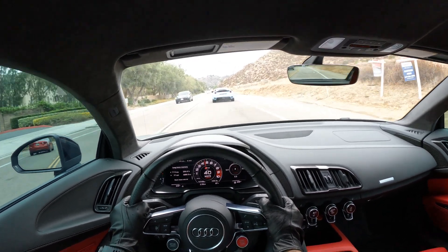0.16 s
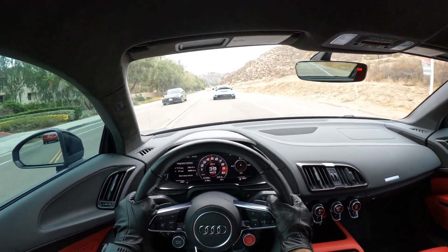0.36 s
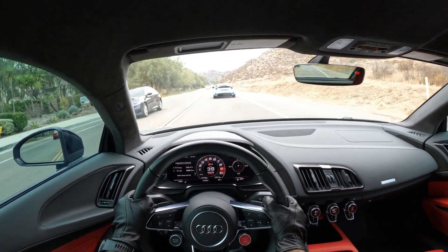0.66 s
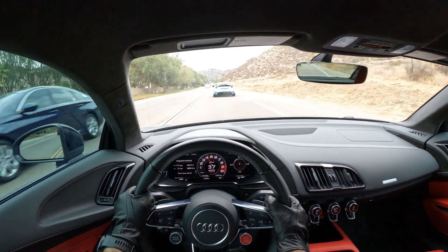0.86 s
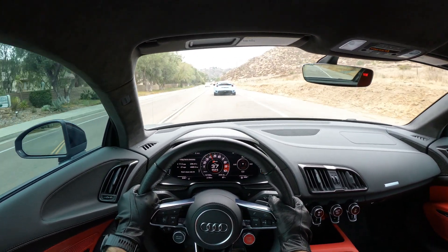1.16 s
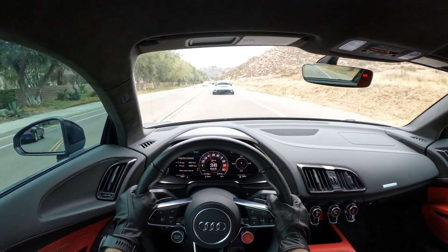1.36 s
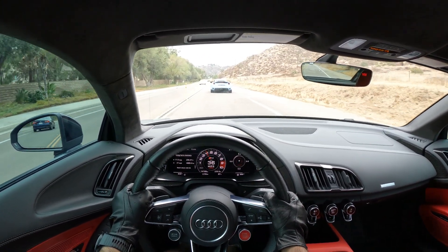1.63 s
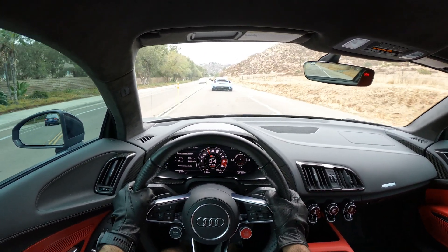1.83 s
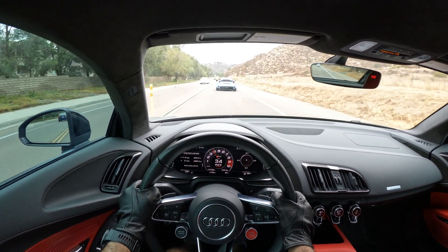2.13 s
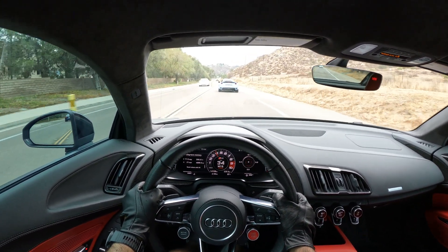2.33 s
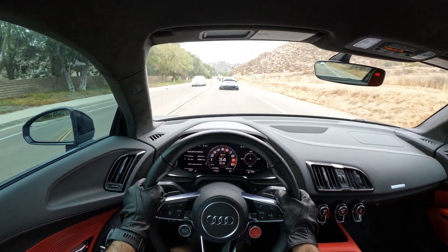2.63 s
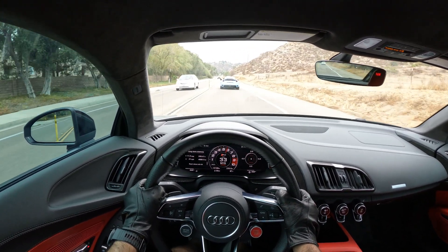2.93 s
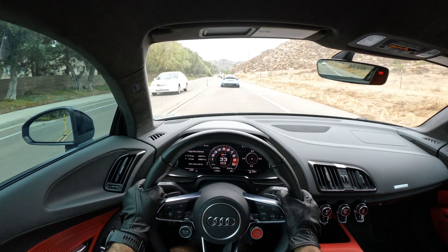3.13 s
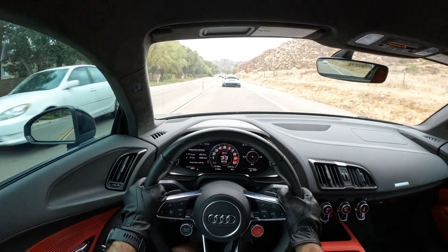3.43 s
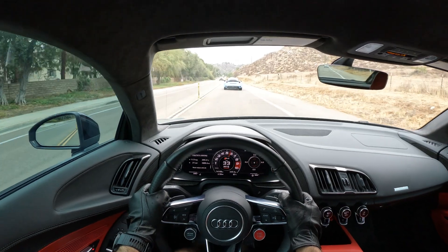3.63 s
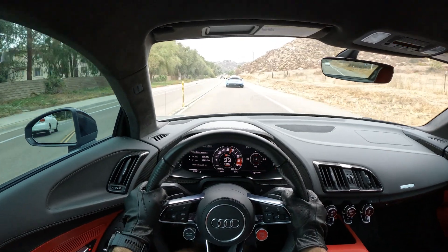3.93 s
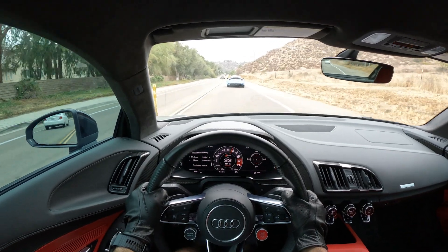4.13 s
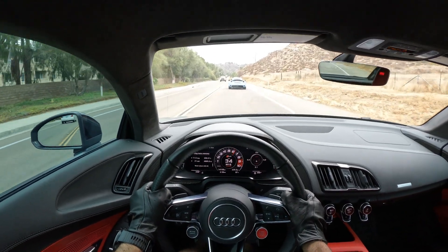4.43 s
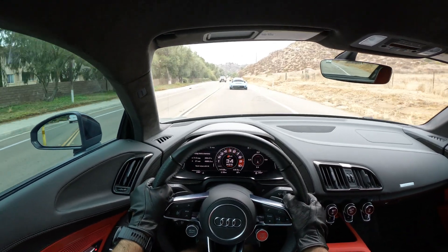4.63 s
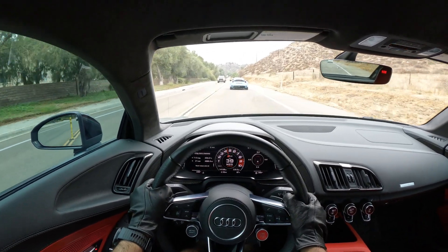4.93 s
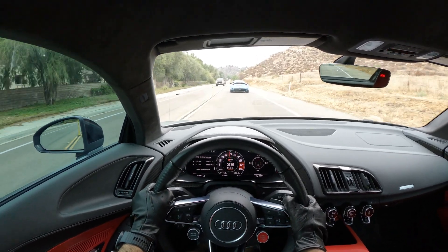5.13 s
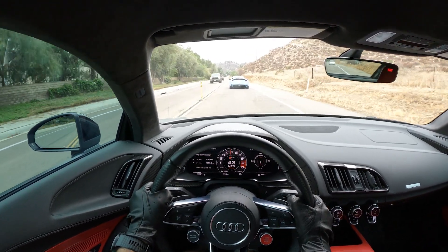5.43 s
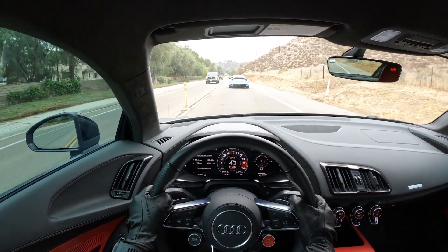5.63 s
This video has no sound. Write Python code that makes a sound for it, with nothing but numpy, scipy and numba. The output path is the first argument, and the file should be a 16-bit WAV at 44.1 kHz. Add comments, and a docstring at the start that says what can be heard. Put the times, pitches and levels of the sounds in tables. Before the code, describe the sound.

Close to the tailpipes, a ten-cylinder engine overruns, barks up, drones hard, snaps through a gear change and ends in sharp crackles.

```python
"""Ten-cylinder exhaust with backfires

A sports car near its tailpipes coasts down with backfires, blips up a downshift, cruises, pulls, shifts up
with a bang, then lifts off and backfires again. Firing harmonics, the lines of five unequal cylinders, gas
noise, clatter and order tones share one crank phase; blasts are decaying modes, burbles short low thuds.
Filtered noise makes the road and a thumping rumble; an overloaded microphone swings slowly after
backfires and clips the peaks.
"""
import sys
import numpy as np
from scipy import signal
from scipy.fft import rfft, irfft
from scipy.io import wavfile
from scipy.ndimage import uniform_filter1d, map_coordinates
from numba import njit

SR = 44100
rng = np.random.default_rng(int(sys.argv[2]) if len(sys.argv) > 2 else 0)


def bounce(signal):
    """Save signal as a 16-bit WAV file at the path given by the first command-line argument."""
    frames = np.transpose(np.atleast_2d(signal))
    limited = np.clip(frames, -1, 1)
    pcm = np.round(limited * 32767).astype(np.int16)
    wavfile.write(sys.argv[1], SR, pcm)


N = 255339  # samples

# Engine course in groups: coasting, blip, cruise and pull, gear change, pull and lift-off.
# Each row: time in s, firing rate in Hz, firing note in dB rms before flutter, relative gas rush in dB.
ENGINE = [
    [(0.01, 191.7, -30.5, -60), (0.11, 188.6, -26.5, -59.5), (0.27, 190.7, -25.5, -56),
     (0.6, 182, -29, -58.5), (0.9, 177.1, -30.5, -59.5), (1.25, 171.9, -35, -60), (1.7, 164.5, -38.5, -65),
     (2.05, 159.9, -36.5, -65), (2.28, 159.5, -36.5, -65)],
    [(2.31, 162, -29, -78), (2.338, 164.2, -20, -49), (2.43, 202.1, -11.5, -41.5),
     (2.472, 219.1, -11, -34.5), (2.5, 230.9, -11.5, -42.5), (2.522, 229.5, -8, -33.5),
     (2.536, 224.2, -19.5, -45.5), (2.546, 226.7, -13.5, -36.5), (2.57, 224.9, -18.5, -49)],
    [(2.62, 230.9, -15.5, -52), (2.72, 237.1, -12, -46.5), (2.78, 234, -17.2, -50.5),
     (2.87, 238.6, -13.5, -50), (2.96, 241.0, -15, -49.5), (3.02, 231, -19.0, -52.5),
     (3.17, 228.5, -19, -54), (3.36, 243.3, -15.5, -50.5), (3.48, 242.9, -15.5, -50.2),
     (3.7, 235.3, -17.5, -53), (3.9, 242.3, -15.5, -50), (4.04, 247.7, -15.5, -48), (4.19, 240, -15, -54.5),
     (4.27, 250.4, -13, -45.5), (4.38, 262.4, -12, -35), (4.46, 264.4, -12, -34), (4.573, 260.4, -12, -40)],
    [(4.582, 252.3, -32, -47), (4.594, 247.4, -18, -53), (4.66, 195.3, -17, -48), (4.668, 192.9, -21, -60)],
    [(4.68, 186.3, -11, -33), (4.714, 184.4, -14.5, -44), (5.2, 207.1, -14, -44.5),
     (5.29, 201.8, -13.5, -44.5), (5.324, 199.7, -17, -52), (5.402, 195.4, -26, -55),
     (5.506, 207.0, -27.5, -57), (5.58, 203.1, -24.5, -54)],
]
# Overtone level at middle load, by place in the exhaust. Each row: frequency in Hz, level in dB.
PIPE = [(320, -11), (380, -11.5), (420, -14.5), (455, -23), (473, -30), (488, -25), (530, -23.5),
        (610, -25), (660, -24.5), (705, -44), (735, -32.5), (790, -49), (1000, -43.5), (1060, -40),
        (1320, -42.5), (1600, -50), (1850, -59), (2110, -59.5), (2640, -60)]
# Lag of the overtones behind the note. Each row: frequency in Hz, lag in radians.
PIPE_LAG = [(440, 1.5), (475, .2), (540, .2), (560, 2.)]
# Lines between the firing harmonics, from unequal cylinders.
# Each row: multiple of the five-firing pattern rate, relative level in dB.
UNEVEN = [(1, -19), (2, -16), (3, -14.5), (4, -4), (6, -12), (7, -14.5), (8, -0.5), (9, -6.5), (11, -12.5),
          (12, -30), (13, -19), (14, -10.5), (16, -17), (18, -15)]
# Relative sharpness of each blowdown in the pattern. Each entry: mean size in dB.
CYLINDER_DB = [0., -4., -2., -1., -5.]
# Rasp resonances of the blowdowns. Each row: centre in Hz, width in Hz, relative gain in dB.
RASP = [(610, 130, -3), (1084, 310, -1.5), (1252, 240, 1.5), (1510, 363, -6), (2215, 600, -16.5)]
# Spectrum of the rushing gas. Each row: frequency in Hz, relative density in dB per Hz.
GAS = [(2500, -25.5), (4000, 0.5), (4800, -6), (5800, -3.5), (7000, -4.5), (8900, -5.5), (11000, -12),
       (15900, -18)]
# Tailpipe tips rung by the gas. Each row: centre in Hz, width in Hz, relative gain in dB.
EDGE = [(2600, 500, 0), (3580, 280, 4), (4200, 300, 1.5)]
# Spectrum of valve gear and timing drive. Each row: frequency in Hz, relative density in dB per Hz.
CLATTER = [(400, -21.5), (700, -3.5), (1100, -0.5), (2000, -1), (2700, -1.5), (3500, -20.5), (5000, -20.5),
           (9000, -36)]
# Engine order tones: the third firing harmonic's floor and higher whine.
# Each row: multiple of the pattern rate, peak level in dB before flutter.
ORDER_TONES = [(15, -49), (30, -57), (32, -61), (34, -60), (42, -63), (48, -62), (59, -65), (70, -65)]
# Backfires, with the overloaded microphone's slow swing after each.
# Each row: start in s, then relative levels in dB of the blast, its crack, top snap, microphone swing.
POPS = [(0.3141, -7.5, -3.5, -28, -30), (0.3339, -9.5, -9, -22.5, -58), (0.35, -8, -13.5, -35, -48),
        (0.503, -6.5, -2.5, -14.5, -35), (2.518, -8.5, -23, -30, -46), (2.739, -11.5, -17, -35, -38),
        (4.674, -4, -12, -27.5, -33), (5.609, -7, 0.5, -8, -16.5), (5.619, -16, -8, -27, -56),
        (5.663, -7.5, -9, -34, -50), (5.719, -7.5, -20, -29.5, -47.5), (5.735, -7.5, -5, -26, -35),
        (5.787, -16, -7.5, -24, -34)]
# Pipe modes rung by a backfire. Each row: mean frequency in Hz, relative level in dB, 60 dB decay in s.
POP_MODES = [(130, -19.5, 0.18), (277.3, -2.5, 0.14), (395, 11, 0.027), (604, 7.5, 0.022), (1174, 2, 0.028),
             (1430, 7, 0.013), (1625, 12.5, 0.014), (2660, 0.5, 0.016), (3750, -11, 0.027),
             (4590, 1.5, 0.0095), (5180, -16, 0.014), (6440, -29, 0.023), (10497, -48, .008)]
# Muffled burbles deep in the silencer. Each row: start in s, relative level in dB, pitch in Hz.
BURBLES = [(0.07, -19, 188), (0.548, -8, 172), (0.631, -6.5, 207.2), (0.92, -10, 146.7), (2.042, -17, 74.9),
           (2.089, -12.5, 296), (2.54, 2, 240), (2.564, 0, 240.9), (2.733, 1.5, 240), (2.958, -21, 237.7),
           (4.574, -23, 232.1), (4.7, -2, 200.5), (5.469, -8, 198.5)]
# Spectrum of the road noise. Each row: frequency in Hz, relative density in dB per Hz.
ROAD = [(15, -14.5), (25, 11), (45, -7.5), (90, -31), (140, -2.5), (250, 0.5), (400, -5), (650, -11),
        (1100, -18), (2100, -20), (4000, -34), (8600, -39), (15500, -48)]
# Low thumps through the body. Each row: start in s, relative gain in dB.
THUMPS = [(0.037, -18.5), (0.189, -33.5), (0.482, -17), (0.8, -44), (1.139, -37), (1.759, -30),
          (2.028, -21.5), (2.149, -21), (2.397, -19), (2.549, -12), (2.726, -23), (2.944, -38),
          (4.357, -13), (4.552, -13), (4.666, -23), (5.539, -20), (5.689, -19), (5.759, -26)]

# Every load-dependent layer is given at a middle load and swings with the note and the gas.
MIDDLE_NOTE_DB, MIDDLE_GAS_DB = -15, -45
# Octave, third, overtones 4 to 10: dB per dB of note, dB per dB of gas.
OCTAVE_LAW, THIRD_LAW, UPPER_LAW = (1.404, 0.15), (1.66, 0.29), (0.033, 1.594)
# dB at middle load, dB per dB of note, dB per dB of gas.
UNEVEN_LAW, RASP_LAW = (-30.5, 0.82, 0.16), (-32, 0.062, 1.07)
# During the gear change the overtones drop away.
IGNITION_CUT_S, IGNITION_CUT_DB = (4.575, 4.671), -12
CLATTER_DB = -45.5  # rms before the speed law, whose gain is 1 at 200 firings/s
SECOND_PIPE_S = 0.000786  # the other tailpipe's blast comes later
# Uneven faint firing just before the blip: from-to s, mean dB, mean Hz, thuds.
GURGLE_S, GURGLE_DB, GURGLE_HZ, GURGLE_COUNT = (2.05, 2.29), -23, 330, 12
ROAD_DB = -37  # rms
RUMBLE_DB, THUMP_RISE_S, THUMP_FADE_S = -48.5, 0.0092, 0.047  # relative floor, time constants
TOP_HZ = 15950  # upper band limit


def undb(db):
    """Decibel definition: amplitude ratio from a level difference."""
    return 10 ** (np.asarray(db) / 20)


def level(x, db):
    """Mean-square normalisation: scale x to an rms level in dB."""
    return x * undb(db) / np.sqrt(np.mean(x ** 2))


@njit
def svf(x, hz, width):
    """Second-order resonance: a state-variable band-pass, gain 1 at the centre."""
    y, band, low = np.empty(len(x)), 0., 0.
    g, damping = np.tan(np.pi * hz / SR), width / hz
    for i in range(len(x)):
        v = (band + g * (x[i] - low)) / (1 + g * (g + damping))
        band, low, y[i] = 2 * v - band, low + 2 * g * v, damping * v
    return y


def resonate(x, peaks):
    """Modal superposition: parallel resonances of alternating sign."""
    return sum((-1) ** k * undb(db) * svf(x, 1. * hz, 1. * width)
               for k, (hz, width, db) in enumerate(peaks))


def walk(rate):
    """Slow random modulation: levels held 1 / rate s and slewed twice, spread near 1."""
    k = int(SR / rate)
    held = np.repeat(rng.standard_normal(N // k + 1), k)
    return 1.3 * uniform_filter1d(uniform_filter1d(held, k), k)[:N]


def coloured(points, x):
    """Spectral shaping: weight the spectrum of x by (Hz, dB) points, rms 1."""
    hz, db = np.transpose(points)
    log_f = np.log(np.fft.rfftfreq(N, 1 / SR) + 1)
    return level(irfft(rfft(x) * undb(np.interp(log_f, np.log(hz), db)), N), 0)


def ring(hz, t60, t):
    """Free damped vibration: a sine decaying 60 dB in t60 s."""
    return np.sin(2 * np.pi * hz * t) * np.exp(-np.log(1000) * t / t60)


def soften(x, size):
    """Finite pressure rise: a blast builds over about size samples."""
    return uniform_filter1d(uniform_filter1d(x, size=size), size=size)


def repeating(turns, hold_s):
    """Cyclic repetition: noise recurs with each pattern, blending to a new face every hold_s."""
    size = 768  # points per pattern
    age = np.arange(N) / SR / hold_s
    faces = rng.standard_normal((40, size))
    place = turns / len(CYLINDER_DB) % 1 * size
    return map_coordinates(faces, [np.minimum(age, 39), place], order=1, mode="grid-wrap")


def engine():
    """Phase locking: every engine layer follows one crank phase, counted in firings."""
    s, *columns = np.concatenate(ENGINE).T
    hz, note, gas_db = (np.interp(np.arange(N) / SR, s, c) for c in columns)
    turns = np.cumsum(hz * (1 + .001 * walk(40))) / SR

    def swing(by_note, by_gas):
        """Load dependence: dB change away from the middle load."""
        return by_note * (note - MIDDLE_NOTE_DB) + by_gas * (gas_db - MIDDLE_GAS_DB)

    uneven_db, rasp_db = (db + swing(*law) for db, *law in (UNEVEN_LAW, RASP_LAW))
    return (firing(turns, hz, note, swing) + uneven_lines(turns, uneven_db)
            + exhaust_gas(turns, rasp_db, gas_db) + clatter(turns, hz) + order_tones(turns))


def firing(turns, hz, note, swing):
    """Fourier series: the firing note and nine overtones, coloured and delayed by the pipe."""
    t = np.arange(N) / SR
    cut = IGNITION_CUT_DB * ((t > IGNITION_CUT_S[0]) & (t < IGNITION_CUT_S[1]))
    levels = [note]
    for k, law in enumerate([OCTAVE_LAW, THIRD_LAW] + [UPPER_LAW] * 7, start=2):
        levels.append(cut + np.interp(k * hz, *np.transpose(PIPE)) + swing(*law))
    out = 0
    for k, db in enumerate(levels, start=1):
        lag = (k > 1) * np.interp(k * hz, *np.transpose(PIPE_LAG))
        flutter = 0.57 * walk(60)  # dB
        out = out + np.sqrt(2) * undb(db + flutter) * np.cos(2 * np.pi * k * turns - lag)
    return out


def uneven_lines(turns, uneven_db):
    """Subharmonics of a repeating pattern: five unequal firings fill the gaps between harmonics."""
    out = 0
    for order, db in UNEVEN:
        angle = 2 * np.pi * (turns * order / len(CYLINDER_DB) + rng.random()) + 0.21 * walk(25)
        out = out + np.sqrt(2) * undb(uneven_db + db + 2.0 * walk(39)) * np.cos(angle)
    return out


def exhaust_gas(turns, rasp_db, gas_db):
    """Pulsed turbulence: decaying blowdowns modulate noise, which excites the rasp and pipe tips."""
    count = turns.astype(int)
    firings = count[-1] + 1
    size_db = np.resize(CYLINDER_DB, firings) + 1.2 * rng.standard_normal(firings)
    puff = undb(size_db)[count] * np.exp(-(turns - count) / .5)
    # the gas after each blowdown rushes nearly the same way every pattern
    rush = repeating(turns, .2) + .55 * rng.standard_normal(N)
    blow = puff * rush
    hiss = level((0.66 + puff) * coloured(GAS, rng.standard_normal(N)), -6.5)
    tips = level(resonate(blow + 0.45 * rush, EDGE), -0.11)
    rasp = level(resonate(blow, RASP), -0.21)
    return undb(rasp_db) * rasp + undb(gas_db) * (hiss + tips)


def clatter(turns, hz):
    """Periodic mechanical noise: valve gear and timing drive grow as the cube of speed."""
    return level(coloured(CLATTER, repeating(turns, .35)), CLATTER_DB) * (hz / 200) ** 3.0


def order_tones(turns):
    """Engine orders: the third firing harmonic's floor and higher whine keep fixed ratios to the crank."""
    out, waver = 0, .4 * walk(25)  # shared phase waver, radians
    for order, db in ORDER_TONES:
        angle = 2 * np.pi * turns * order / len(CYLINDER_DB) + waver
        out = out + undb(db + 3 * walk(3.4)) * np.cos(angle)
    return out


def backfires():
    """Impulsive excitation: unburnt fuel blasts ring both pipes, hiss, and overload the microphone."""
    lead = 32  # samples of room ahead of each blast for its softened rise
    out, t = np.zeros(N + SR), np.arange(-lead, SR // 4) / SR
    on = t >= 0
    chance = rng.standard_normal((len(POPS), len(POP_MODES)))
    # the overloaded microphone's slow swing: a quick dip, then a long swell
    mic_swing = on * (1 - np.exp(-t / .002)) * (.7 * np.exp(-t / .04) - 1.9 * np.exp(-t / .009))
    for (s, db, crack_db, snap_db, swing_db), jitter in zip(POPS, chance):
        modes = [(hz, on * undb(gain) * ring(hz * (1 + .03 * j), t60, t))
                 for (hz, gain, t60), j in zip(POP_MODES, jitter)]
        low = soften(sum(m for hz, m in modes if hz < 800), size=20)
        crack = undb(crack_db) * soften(sum(m for hz, m in modes if 800 <= hz < 2200), size=6)
        snap = undb(snap_db + 16.0) * sum(m for hz, m in modes if hz >= 2200)
        high = crack + snap
        high = high + 1.33 * np.interp(t - SECOND_PIPE_S, t, high, left=0)
        hiss = on * svf(rng.standard_normal(len(t)), 1500., 1700.0) * np.exp(-t / 0.0091)
        hiss = hiss * undb(crack_db - 2.0)
        blast = undb(db - 7.0) * (low + high + hiss)
        start = int(s * SR)
        out[start:start + len(t)] += blast + undb(swing_db + 15.5) * mic_swing
    return out[lead:N + lead]


def burbles():
    """Damped oscillation: soft low thuds with a dull overtone, and a faint gurgle before the blip."""
    out, t = np.zeros(N + SR), np.arange(SR // 8) / SR
    chance = rng.standard_normal((GURGLE_COUNT, 3))
    times = np.linspace(*GURGLE_S, GURGLE_COUNT) + .006 * chance[:, 0]
    gurgle = zip(times, GURGLE_DB + 3 * chance[:, 1], GURGLE_HZ * (1 + .2 * chance[:, 2]))
    for s, db, hz in [*BURBLES, *gurgle]:
        thud = ring(hz, 0.028, t) + 0.23 * ring(2.9 * hz, 0.021, t)
        thud = thud * (1 - np.exp(-t / 0.0022))  # soft onset
        start = int(s * SR)
        out[start:start + len(t)] += undb(db) * thud
    return out[:N]


def road():
    """Band-wise modulated noise: tyre and wind bands flicker over a lumpy low rumble."""
    noise = coloured(ROAD, rng.standard_normal(N))
    bands = 0
    for hz in 30. * 2 ** np.arange(9.):
        depth_db = min(3., 1500 / hz)  # the lows gust; the treble hiss stays nearly even
        bands = bands + undb(depth_db * walk(9)) * svf(noise, hz, hz * .7)
    lumps = svf(svf(rng.standard_normal(N), 40., 70.), 35., 90.) * undb(2.4 * walk(14))
    return level(bands, ROAD_DB) + level(lumps, -6) * thumps()


def thumps():
    """Amplitude modulation: rumble gain with a wavering floor, swelling and fading at each thump."""
    t = np.arange(N) / SR
    out = undb(RUMBLE_DB) * undb(1.0 * walk(7.4))
    for s, db in THUMPS:
        age = np.maximum(t - s, 0)
        out = out + undb(db) * (1 - np.exp(-age / THUMP_RISE_S)) * np.exp(-age / THUMP_FADE_S)
    return out


def scene():
    """Linear superposition: the sources add in one channel."""
    return (engine() + backfires() + burbles() + road())[None]


def record(dry):
    """Overload and band limiting: the microphone clips the highest peaks, then the top is cut."""
    clipped = np.clip(dry, -.98, .98)
    low_pass = signal.ellip(10, .2, 80, TOP_HZ, fs=SR, output="sos")
    return signal.sosfilt(low_pass, clipped)


dry = scene()
out = record(dry)
bounce(out)
```